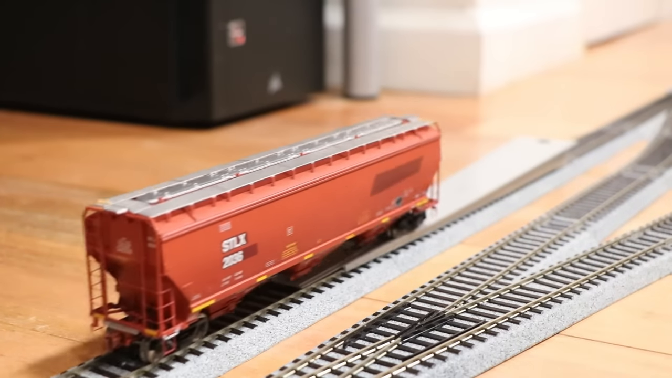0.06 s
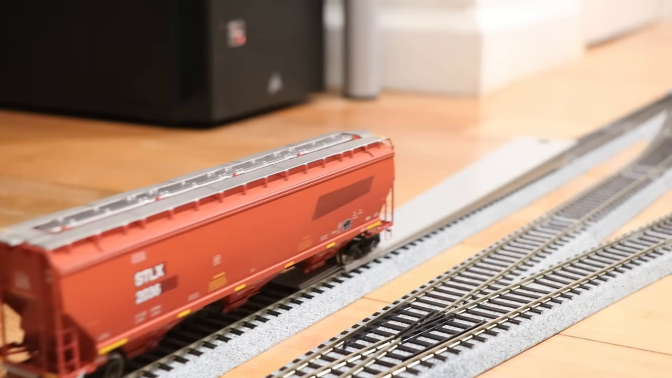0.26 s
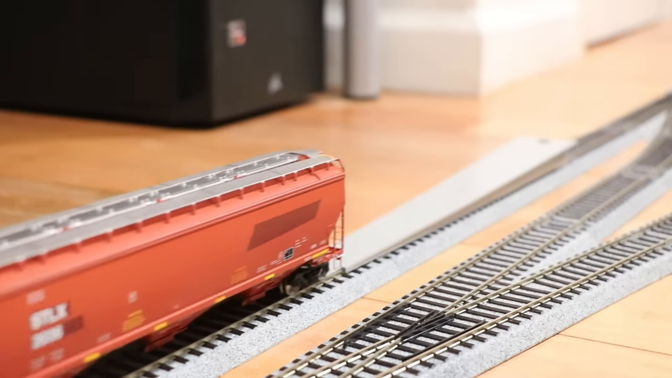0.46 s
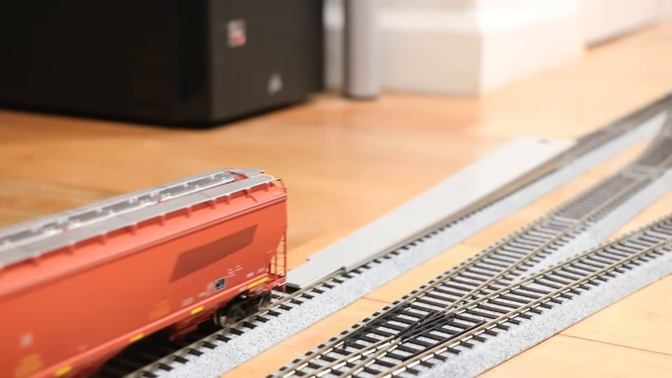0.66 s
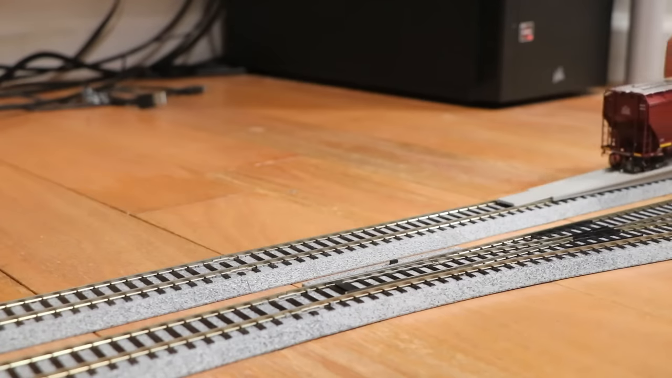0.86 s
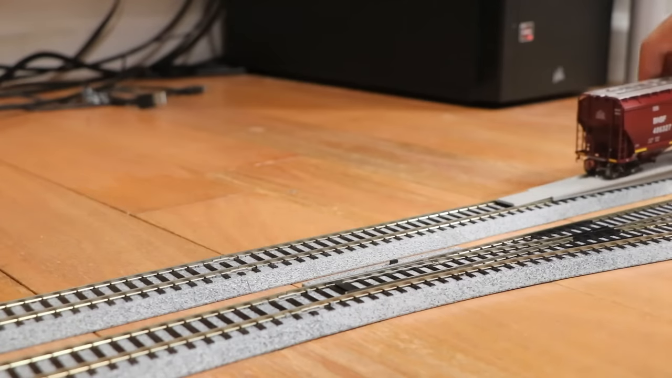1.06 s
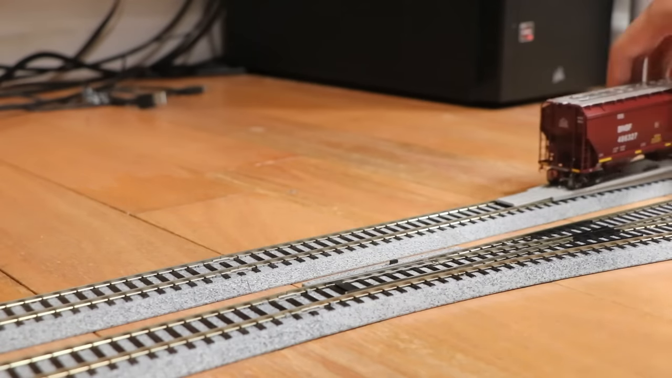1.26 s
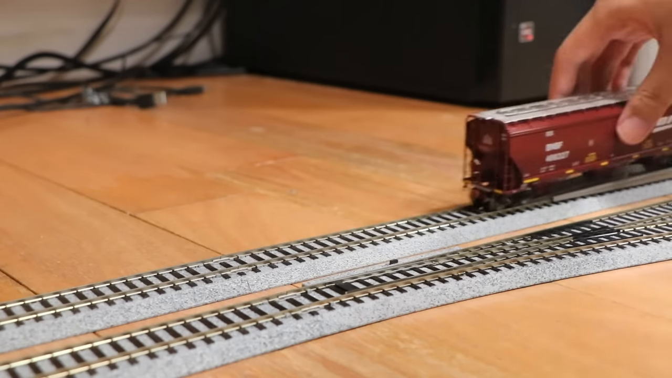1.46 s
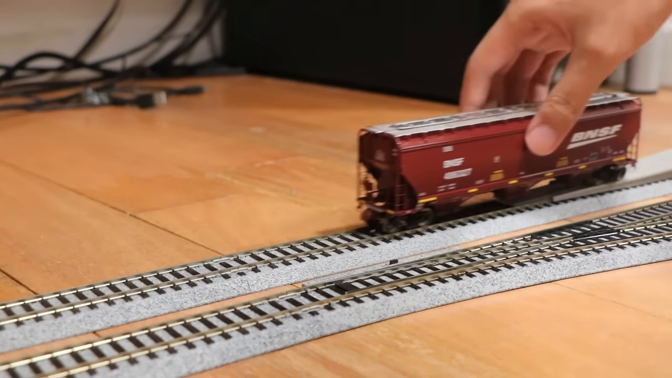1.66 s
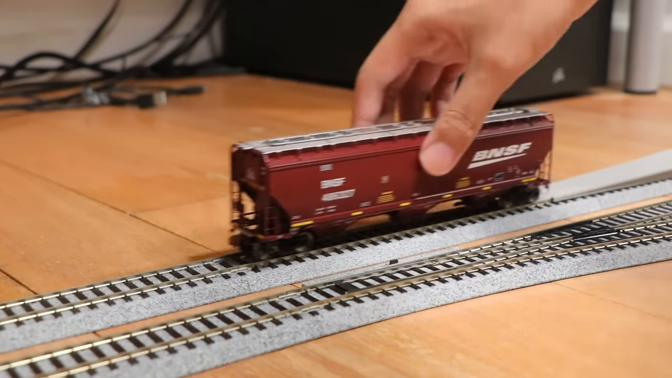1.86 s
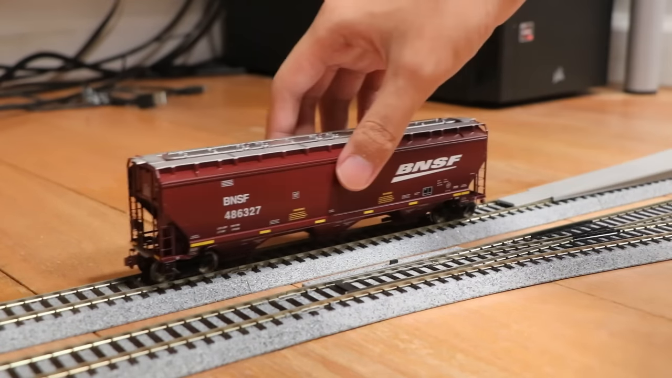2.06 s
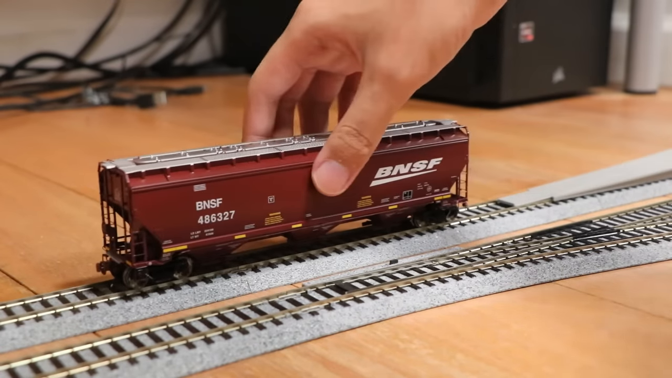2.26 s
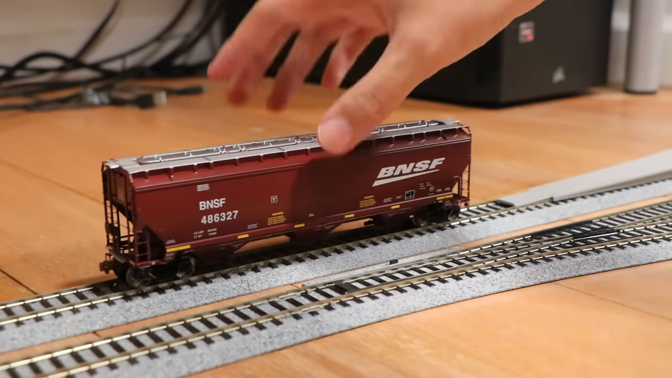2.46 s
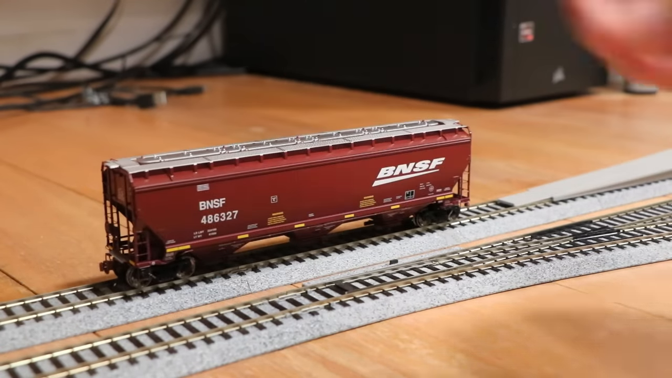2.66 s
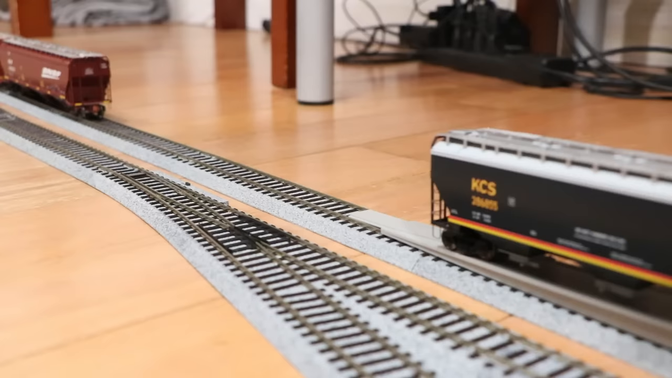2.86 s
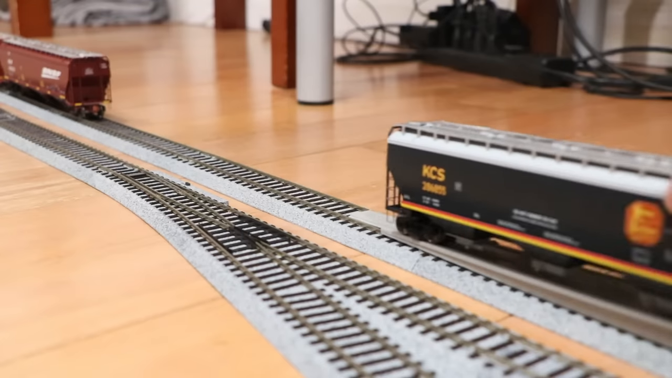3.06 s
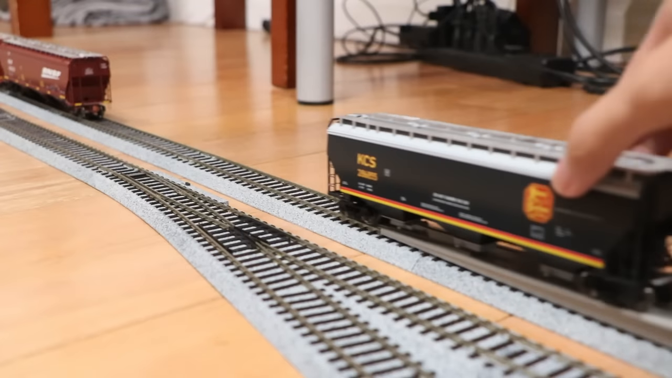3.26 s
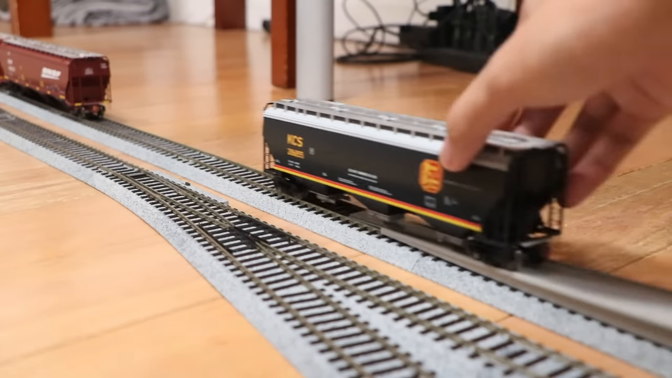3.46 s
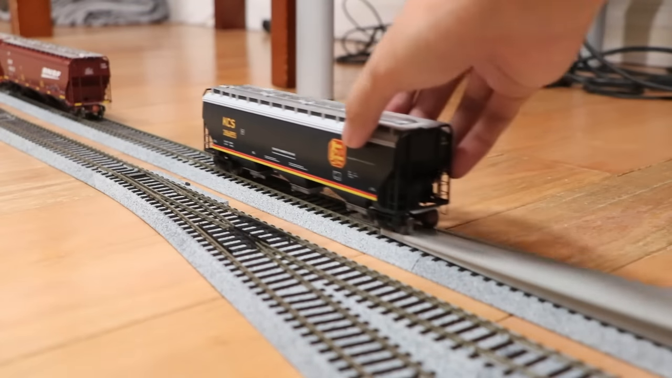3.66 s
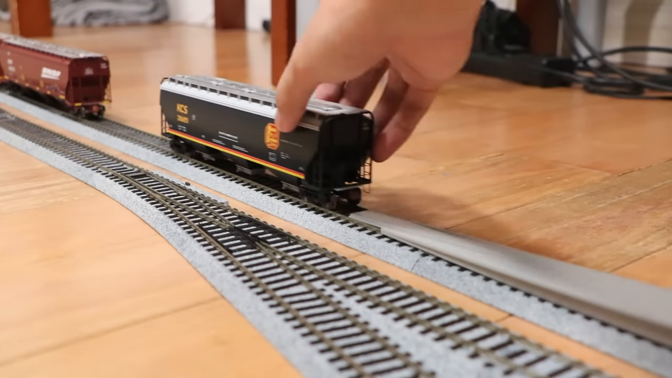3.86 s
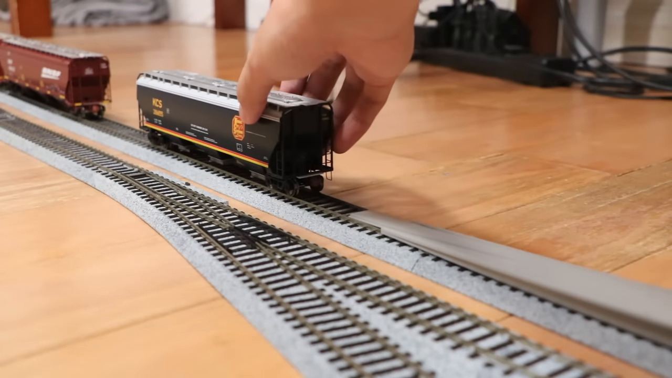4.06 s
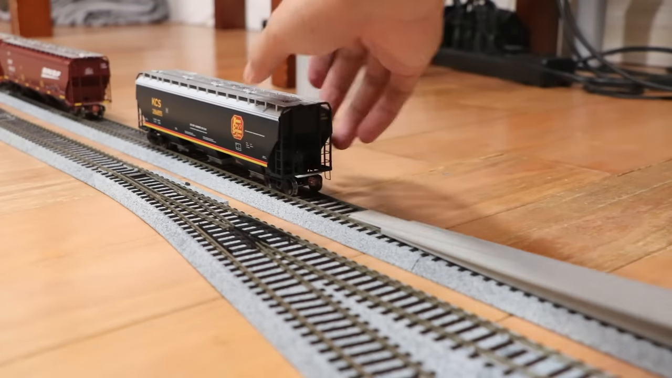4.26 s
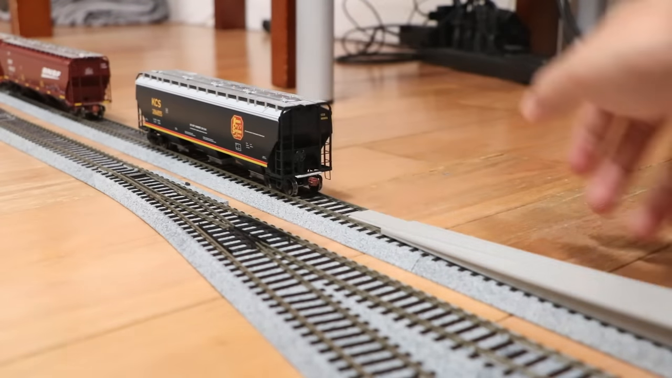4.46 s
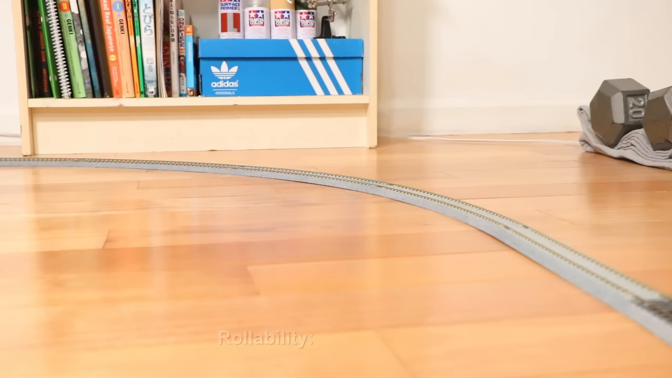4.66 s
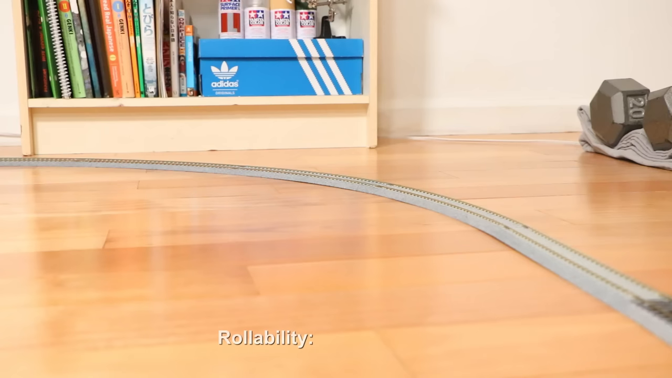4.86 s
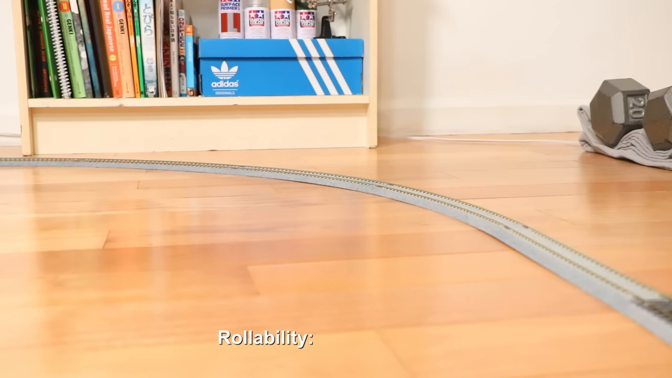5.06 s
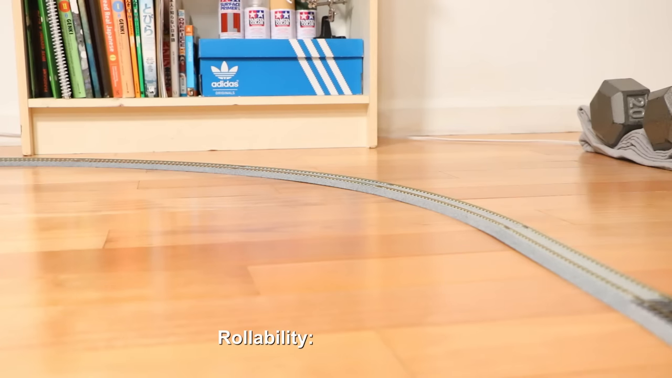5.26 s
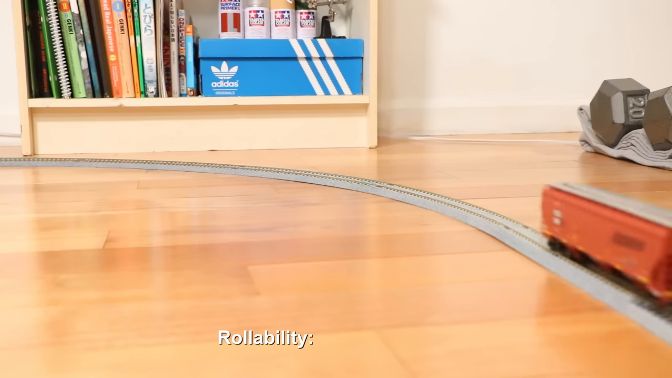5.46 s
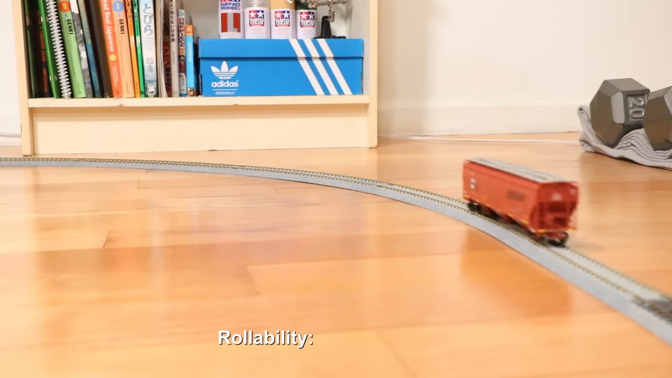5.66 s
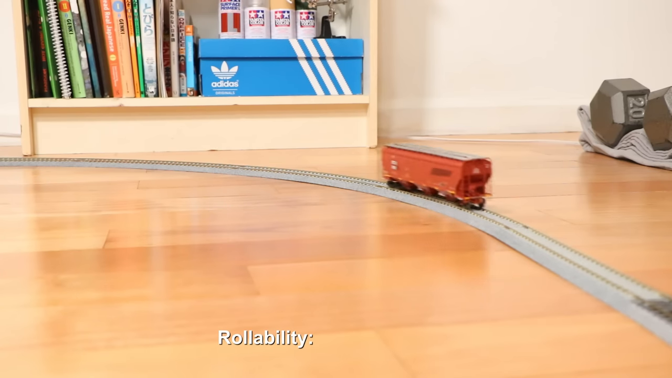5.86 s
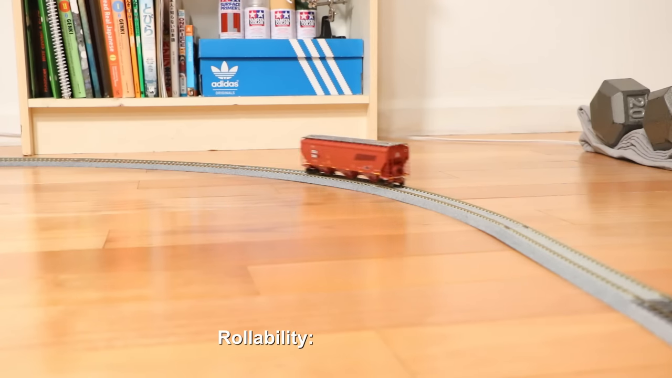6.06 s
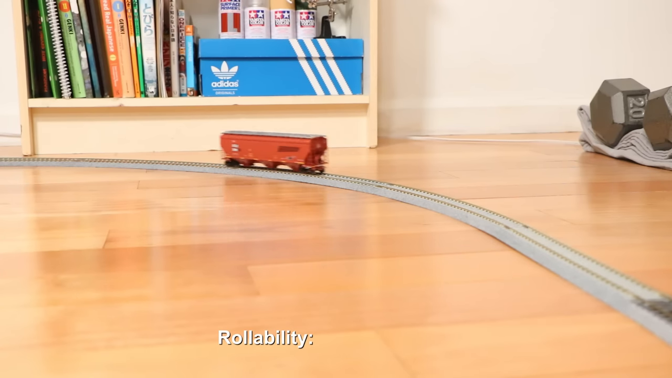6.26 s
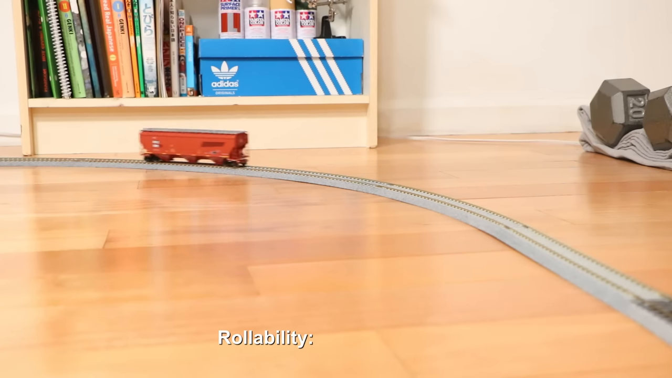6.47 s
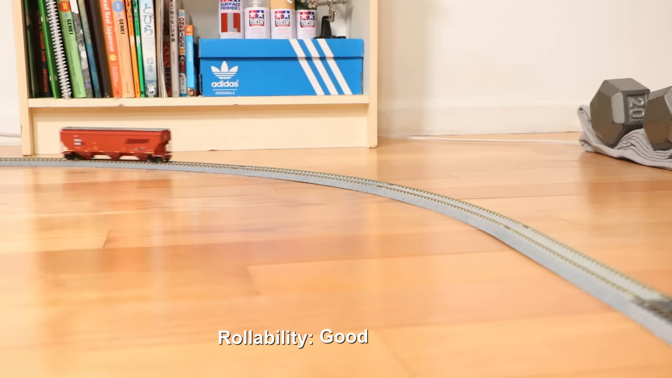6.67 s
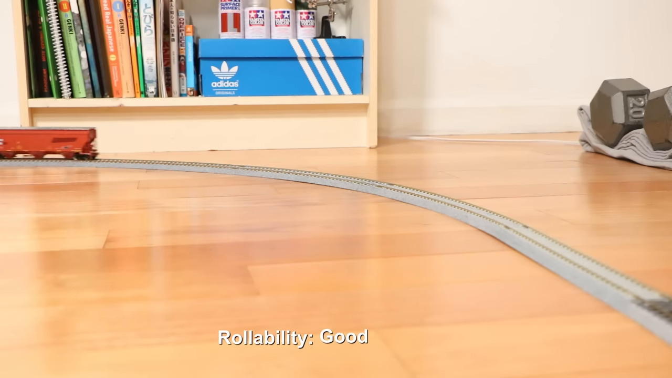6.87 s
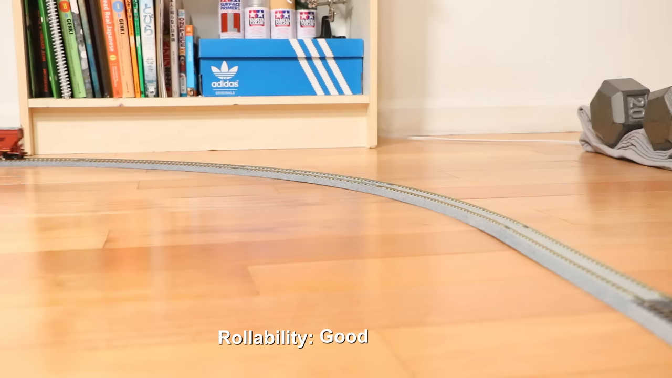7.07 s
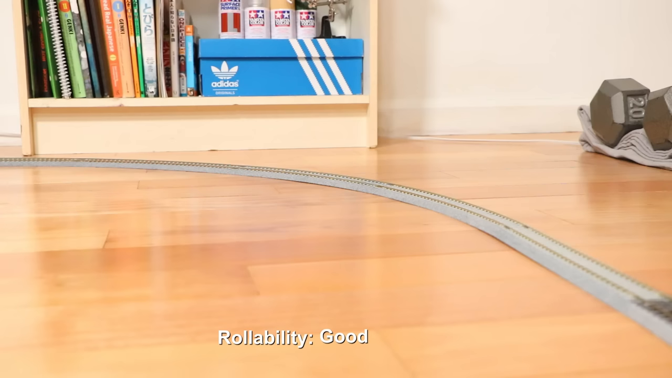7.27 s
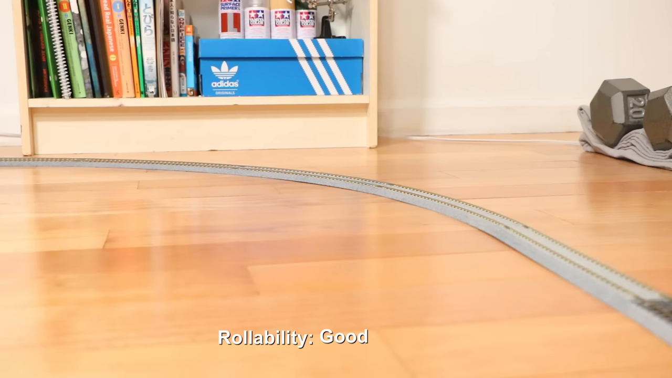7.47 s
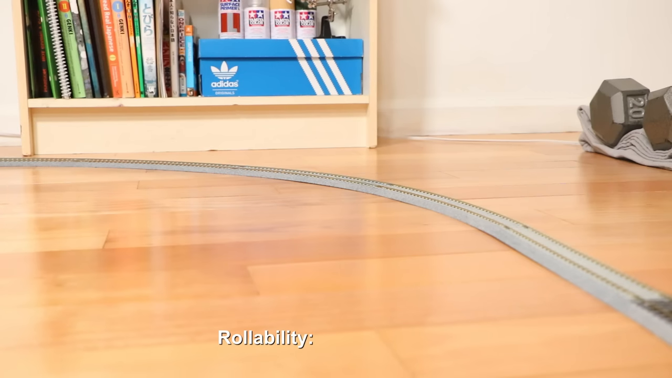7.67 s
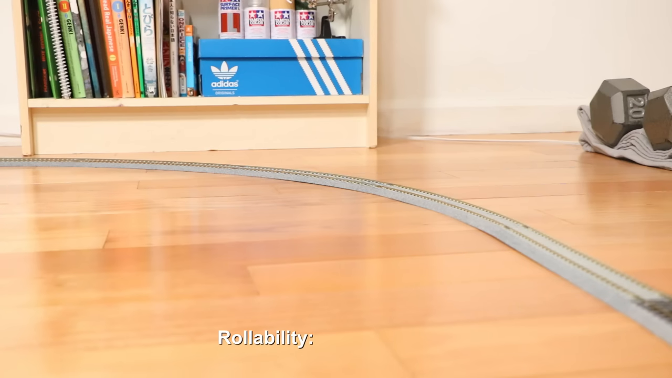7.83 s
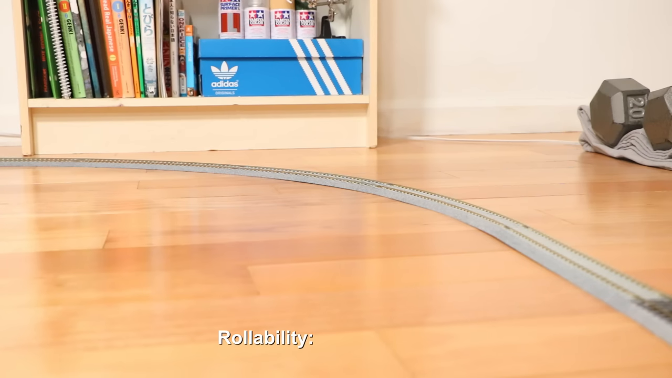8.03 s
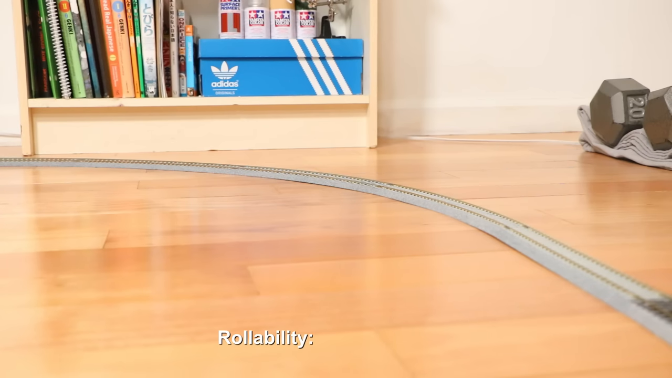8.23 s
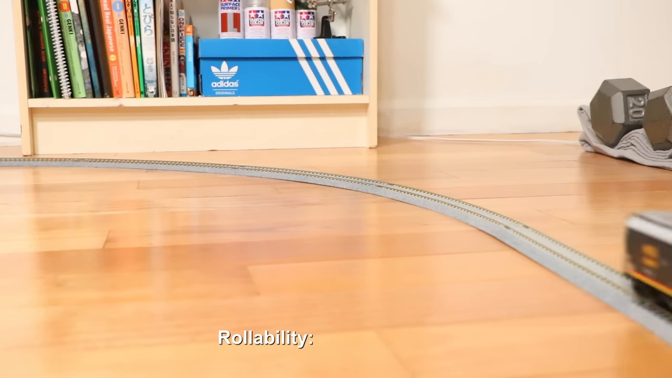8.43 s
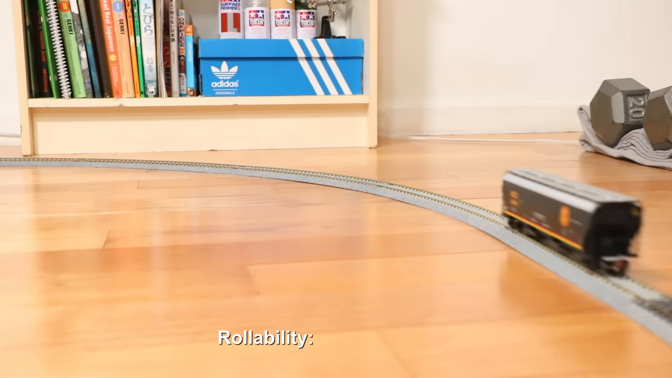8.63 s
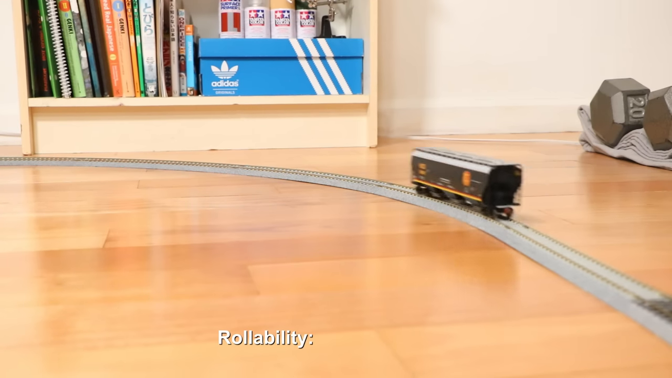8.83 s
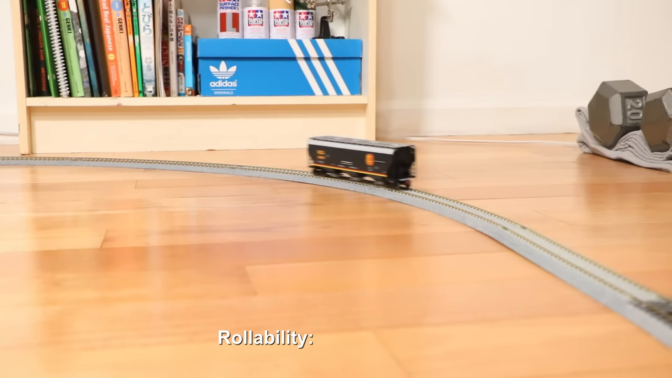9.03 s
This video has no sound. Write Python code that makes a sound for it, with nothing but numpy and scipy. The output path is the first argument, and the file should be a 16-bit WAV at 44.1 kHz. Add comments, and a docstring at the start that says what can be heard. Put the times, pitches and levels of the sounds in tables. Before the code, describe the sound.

Close indoor pickup of toy train cars on plastic track over floorboards. First come soft rolling and light coupler taps, then two short hand-pushed rolls with brittle clicks and a hard clack. Then a car let go makes a continuous bright hissing rattle, jolting over joints, growing as it passes and becoming boomier farther off. A second run starts as it ends, still rolling at the finish. Low hum and floor rumble underneath.

```python
"""A model freight car coasts by with light clicks, two are eased down a ramp by hand, and two are let go
down the ramp and round a curve, rattling from right to left over a quietly humming, hissing room.
Rolling is random wheel impacts and grinding noise, rung by short modes and split into shell, track bed and treads.
Taps are decaying noise bursts with ringing car-body modes and a room tail; squeaks and knocks are band noise.
The wooden floor drums and rumbles as steady coloured noise with passing swells."""
import sys
import numpy as np
from scipy import signal
from scipy.fft import rfft, irfft, next_fast_len
from scipy.io import wavfile
from scipy.ndimage import uniform_filter1d, map_coordinates

SR = 44100
rng = np.random.default_rng(int(sys.argv[2]) if len(sys.argv) > 2 else 0)


def master(y):
    """Save y as 16-bit WAV."""
    cut = np.clip(np.atleast_2d(y).T, -1, 1)
    pcm = np.round(cut * 32767)  # scale
    wavfile.write(sys.argv[1], SR, pcm.astype(np.int16))


N = 401310
TIME = np.arange(N) / SR  # seconds
# course of every car let go, in seconds after release: ramp, curve, far stretch
CURVE_AT_S, CURVE_BLEND_S = 0.97, 0.21
FAR_AT_S, FAR_BLEND_S = 1.97, 0.22


def amp(db):
    """Decibels to gain."""
    return np.exp(np.asarray(db) * (np.log(10) / 20))


def unit(x):
    """x at rms 1."""
    return x / np.sqrt(np.mean(x ** 2) + 1e-20)


def along(points, hz):
    """Read (Hz, value) points on a log frequency axis."""
    f, v = np.transpose(points)
    return np.interp(np.log(hz + 1), np.log(f + 1), v)


def curves(rows):
    """One value per sample for each column after the time."""
    s, *cols = np.transpose(rows)
    return [np.interp(TIME, s, c) for c in cols]


def wobble(rate):
    """A smooth random curve with rate knots a second."""
    knots = rng.standard_normal(int(N * rate / SR) + 4)
    coarse_time = TIME[::32]
    return np.interp(TIME, coarse_time, map_coordinates(knots, [coarse_time * rate]))


def bell(t, centre_s, half_s):
    """A smooth swell that peaks at 1."""
    return np.exp(-np.minimum(((t - centre_s) / half_s).astype(np.float32) ** 2 / 2, 20))


def step(t, at_s, blend_s):
    """A smooth change from 0 to 1."""
    return .5 + .5 * np.tanh((t - at_s) / blend_s)


def surges(rows):
    """Rows (time [s], half length [s], gains [dB]) summed into one dB curve for each gain column."""
    rows = np.array(rows)
    return rows[:, 2:].T @ np.array([bell(TIME, s, half) for s, half in rows[:, :2]])


def filtered(x, response):
    """Filter x by a gain given as a function of frequency."""
    n = x.shape[-1]
    m = next_fast_len(n + 8192, True)  # spare length for the filter's tail
    gain = response(np.fft.rfftfreq(m, 1 / SR)).astype(np.float32)
    return irfft(rfft(x.astype(np.float32), m) * gain, m)[..., :n]


def below(hz, edge_hz):
    """Gain of a steep low-pass."""
    return 1 / np.sqrt(1 + (hz / edge_hz) ** 10)


def above(hz, edge_hz):
    """Gain of the matching high-pass."""
    return np.sqrt(1 - below(hz, edge_hz) ** 2)


def band(hz, centre_hz, octaves):
    """Gain of a bell-shaped band."""
    return np.exp(-(np.log2((hz + 1) / centre_hz) / octaves) ** 2 / 2)


def pair(size, side_db):
    """Stereo white noise: a common part and an opposed part side_db above it."""
    mid, side = rng.standard_normal((2, size))
    side = amp(side_db) * side
    return unit(np.array([mid + side, mid - side]))


def add(out, s, sound):
    """Mix a sound in at time s."""
    start = round(s * SR)
    sound = sound[:, max(-start, 0):]
    part = out[:, max(start, 0):][:, :sound.shape[1]]
    part += sound[:, :part.shape[1]]


def room_tone(air_db, hum_db):
    """Faint coloured hiss, and hum tones that waver in level and phase."""
    # colour of the hiss: (frequency [Hz], gain [dB])
    hiss_colour = [(100, -7), (350, -4.5), (600, -5), (1000, -3.5), (2000, -11), (5000, -14.5),
                   (15500, -24)]
    # hum tones: (frequency [Hz], relative level [dB])
    hum_tones = [(97, -66), (236, -65.5)]
    hiss = filtered(pair(N, side_db=-0.5), lambda hz: amp(along(hiss_colour, hz)))
    hum = np.zeros(N)
    for hz, db in hum_tones:
        swell = amp(db + 3.2 * wobble(3.9))
        hum += swell * np.sqrt(2) * np.sin(2 * np.pi * hz * TIME + 1.16 * wobble(5.6))
    return amp(air_db) * unit(hiss) + amp(hum_db) * hum


def boards():
    """The wooden floor drums and rumbles under the track, more faintly after about 5.5 s, with passing swells."""
    # colour of the drumming: (frequency [Hz], gain [dB])
    drum_colour = [(100, -53), (160, -8), (205, 2), (290, -3.5), (370, -10.5), (500, -12.5), (800, -16),
                   (2000, -76.5)]
    # colour of the rumble: (frequency [Hz], gain [dB])
    rumble_colour = [(20, -24), (40, -18), (65, 4), (100, -3.5), (140, 0), (220, -13.5), (500, -46),
                     (2000, -90)]
    # passing swells: (time [s], half length [s], drumming gain [dB], rumble gain [dB])
    swells = [(0.678, 0.037, 5, 8), (3.347, 0.18, 3, 3), (4.2, 0.14, 3, 3.5), (6.747, 0.11, 2, 8.5),
              (7.303, 0.37, 6, 2.5), (7.755, 0.16, 8.5, 7), (8.05, 0.28, 5, 4), (9, 0.52, 7.5, 1)]
    early_db, late_db = [-51, -55], [-62, -60.5]  # drumming, rumble
    late = step(TIME, at_s=5.46, blend_s=0.35)
    drum_db, rumble_db = np.outer(early_db, 1 - late) + np.outer(late_db, late) + surges(swells)
    drumming = unit(filtered(pair(N, side_db=-15.5), lambda hz: amp(along(drum_colour, hz))))
    rumble = unit(filtered(pair(N, side_db=-15.5), lambda hz: amp(along(rumble_colour, hz))))
    return amp(drum_db) * drumming + amp(rumble_db) * rumble


def wheel_chatter(rate, spread_db, flutter_db, grind_db):
    """Wheels strike specks and pits in the rail at random, rate times a second, over a fine grinding."""
    count = int(rate * N / SR)
    place, strength, sign = rng.random((count, 3)).T
    size = amp(-spread_db * np.log(np.maximum(strength, .02))) * np.sign(sign - .5)
    impacts = unit(np.bincount((place * N).astype(int), size, N))
    grind = amp(grind_db) * rng.standard_normal((2, N))
    return (impacts + grind) * amp(flutter_db * wobble(60))


def ringing(t60):
    """The crowded, short-lived modes of plastic parts, as decaying noise with energy 1 on the left."""
    t = np.arange(SR // 16) / SR
    ring = pair(len(t), side_db=1) * amp(-60 * t / t60)
    return ring / np.linalg.norm(ring[0])


def travelling(chatter, first, last, pan, t60, ring_db, lag_per_db):
    """Each stretch of track answers with other modes; the direct sound reaches the nearer ear first."""
    out, hop = np.zeros((2, N)), SR // 40
    window = np.sin(np.pi * np.arange(2 * hop) / (2 * hop))
    padded = np.pad(chatter, ((0, 0), (hop, 2 * hop)))
    begin = max(int(first * SR) - 2 * hop, -hop)
    end = min(int(last * SR) + 2 * hop, N)
    for start in range(begin, end, hop):
        lag = np.clip(-lag_per_db * pan[max(start, 0)], -16, 16)  # samples between the ears
        arrival = np.sinc(np.arange(40) - 20 - np.array([[lag], [-lag]]) / 2)
        stretch = padded[:, start + hop:start + 3 * hop] * window
        direct = signal.fftconvolve(stretch * window, arrival, axes=1)
        rung = signal.fftconvolve(stretch, amp(ring_db) * ringing(t60), axes=1)
        add(out, start / SR, direct)
        add(out, start / SR, rung)
    return out


def patchy(x, depth_db):
    """Resonances swell and fade as the wheels move along the track."""
    z = signal.stft(x, nperseg=1024)[2]
    field = uniform_filter1d(rng.standard_normal(z.shape[1:]), size=4, axis=0)  # across frequency
    field = uniform_filter1d(field, size=24, axis=1)  # across time
    return signal.istft(z * amp(depth_db * unit(field)), nperseg=1024)[1][:, :N]


def parts(chatter, colour):
    """The chatter sounds in the shell (low), the track bed (middle) and the treads (high), each at rms 1."""
    def response(hz):
        shell = above(hz, 350) * below(hz, 1610)
        bed = above(hz, 2076) * below(hz, 4410)
        tread = above(hz, 5880)
        return (np.array([shell, bed, tread]) * amp(along(colour, hz)))[:, None]

    first, last = np.flatnonzero(chatter[0])[[0, -1]]
    out = np.zeros((3, 2, N), np.float32)
    out[..., first:last] = filtered(chatter[:, first:last], response)
    return np.array([unit(x) for x in out])


def rolling(voices, levels_db, pan_db):
    """Mix shell, track bed and treads, each at its level, at the car's place between left and right."""
    sides = np.array([[.5], [-.5]])
    shell, bed, tread = voices * amp(np.float32(levels_db))[:, None]
    bed = bed * amp(-1.5 * sides)  # the bed sounds from further right than the car
    return (shell + bed + tread) * amp(pan_db * sides)


def heard(first, last):
    """1 while a run is heard, with short fades."""
    return np.interp(TIME, [first - .026, first - .016, last + .014, last + .022], [0, 1, 1, 0])


def slow_run(run, voices, shell_db, bed_db, tread_db, pan_db):
    """One strength drives all three parts: the treads follow it most, the shell least, so harder is brighter."""
    usual_db = -37  # strength at which the balance of the parts is given
    effort = curves(run)[0] - usual_db
    levels = [shell_db + 0.71 * effort, bed_db + effort, tread_db + 1.01 * effort]
    return heard(run[0][0], run[-1][0]) * rolling(voices, usual_db + np.array(levels), pan_db)


def slow_cars():
    """One car coasts, two are pushed: at a crawl impacts are sparser and the shell rings more clearly."""
    # rolling strength of the coasting car: (time [s], level [dB])
    coast = [(0.0, -40), (0.136, -39.5), (0.52, -37), (0.632, -34), (0.762, -36.5), (0.77, -65)]
    # rolling strength of the first pushed car: (time [s], level [dB])
    first_push = [(1.06, -50.5), (1.08, -54), (1.578, -26), (1.722, -32.5), (1.83, -26.5), (1.978, -29.5),
                  (1.992, -24), (2.13, -37), (2.278, -59.5), (2.3, -71)]
    # the second, up to its drop onto the rails, then on along them: two lists of (time [s], level [dB])
    second_push = [
        [(2.97, -59), (3.03, -43), (3.258, -39), (3.34, -34.5), (3.344, -31.5), (3.39, -28)],
        [(3.47, -27.5), (3.73, -27), (3.746, -30.5), (3.908, -27.5), (4.05, -35.5), (4.18, -62)],
    ]
    # colour of rolling while coasting: (frequency [Hz], gain [dB])
    coast_colour = [(180, -45), (300, -14), (360, -19), (562, 0), (937, -8), (1070, -0.5), (1390, -0.5),
                    (2040, -1), (4880, -16), (11300, -27), (15500, -41)]
    # colour of rolling while pushed by hand: (frequency [Hz], gain [dB])
    pushed_colour = [(400, -17), (520, -14.5), (630, -6.5), (900, -9), (1100, -5), (1550, -2), (1900, -1.5),
                     (2400, 0.5), (3700, -8), (4700, -12), (6000, -20.5), (9800, -27.5), (15500, -39)]
    chatter = wheel_chatter(rate=2600, spread_db=2.0, flutter_db=0.26, grind_db=0)
    second = np.vstack(second_push)
    rung = travelling(chatter, coast[0][0], second[-1][0], np.full(N, -.5),
                      t60=0.087, ring_db=-2.0, lag_per_db=3.0)
    rung = patchy(rung, depth_db=1.73)
    coasting, pushed = parts(rung, coast_colour), parts(rung, pushed_colour)
    return (slow_run(coast, coasting, shell_db=-4.0, bed_db=-2.5, tread_db=-15.0, pan_db=0.5)
            + slow_run(first_push, pushed, shell_db=-5.5, bed_db=-5.5, tread_db=-17.0, pan_db=-1.8)
            + slow_run(second, pushed, shell_db=-6.5, bed_db=-3.5, tread_db=-17.5, pan_db=-1.4))


def clicks(t60, crack_t60, crack_db, modes_db, level_db):
    """Wheels drop and couplers tap: a brief crack, a dying rattle and car-body modes at new strengths."""
    # taps: (time [s], relative level [dB], boost of the bright ring [dB])
    tap_list = [(.556, -23, -12), (0.599, -24, -8), (.623, -11.5, -2), (.639, -23, -3), (.742, -25.5, 2),
                (0.9108, -15, 12), (0.9173, -10, 12), (.964, -13, -1), (.9685, -15.5, 6), (1.361, -17, 7),
                (1.51, -14, -3), (1.5384, -10, 5), (1.987, -19, -7), (3.019, -28, -5), (3.285, -20, -7),
                (3.345, -6.5, 1), (3.357, -9, -2), (3.4193, -10, 0), (3.425, -1.5, 0), (3.841, -5.5, 8),
                (3.8458, -16, 1), (3.902, -8, -3), (5.1035, -21, -2), (5.3403, -23, 2), (5.409, -8, -3)]
    # colour of a tap: (frequency [Hz], gain [dB])
    tap_colour = [(200, -45), (400, -25), (900, -12.5), (1500, -4), (2000, -6), (2700, -1), (3900, -10.5),
                  (5500, -18.5), (8000, -22.5), (15500, -41)]
    # modes of the plastic car body: (frequency [Hz], mean relative level [dB], t60 [s])
    car_modes = [(1453, -15, .15), (1760, -5, 0.065), (1880, -12, .12), (2230, -7, .055), (2820, -16, .06),
                 (3120, -11, .07), (3930, -13, .04), (3820, -9, .07), (4400, -10, .05), (5470, -15, .04)]
    out, t = np.zeros((2, N)), np.arange(SR // 8) / SR
    for s, db, bright_db in tap_list:
        def response(hz):
            return amp(along(tap_colour, hz) + bright_db * band(hz, centre_hz=4530, octaves=0.43))

        decay = amp(-60 * t / t60) + amp(crack_db - 60 * t / crack_t60)
        tap = filtered(pair(len(t), side_db=-3.5) * decay, response)
        ring = np.zeros((2, len(t)))
        for hz, mode_db, life in car_modes:
            strength = amp(mode_db + rng.normal(0, 3.6, (2, 1)) - 60 * t / life)
            ring += strength * np.sin(2 * np.pi * (hz * t + rng.random((2, 1))))
        sound = tap / np.abs(tap).max() + amp(modes_db) * ring / np.abs(ring).max()
        add(out, s, amp(db + level_db) * sound)
    return out


def room(x):
    """The room's answer: a noise tail, 5 ms late, each frequency dying at its own speed."""
    # decay of the room: (frequency [Hz], t60 [s])
    room_decay = [(200, 0.21), (2000, 0.29), (6000, 0.18), (14000, 0.18)]
    hz, t, z = signal.stft(rng.standard_normal((2, SR // 2)), SR, nperseg=256)
    tail = signal.istft(z * amp(-60 * t / along(room_decay, hz)[:, None]), SR, nperseg=256)[1]
    tail = np.pad(tail / np.linalg.norm(tail[0]), ((0, 0), (SR // 200, 0)))
    return signal.fftconvolve(x, tail, axes=1)[:, :N]


def rubs():
    """Fingers scuff the car and a flange squeaks on the ramp: short swells of band noise."""
    # sliding contacts: (time of the peak [s], half length [s], level [dB], centre [Hz], width [octaves])
    rub_list = [(2.903, 0.017, -47, 1500, 1), (3.399, 0.0097, -23, 3050, 0.04)]
    out, t = np.zeros((2, N)), np.arange(SR) / SR - .5
    for s, half, db, centre_hz, octaves in rub_list:
        tone = unit(filtered(pair(SR, side_db=-1), lambda hz: band(hz, centre_hz, octaves)))
        add(out, s - .5, amp(db) * tone * np.exp(-(t / half) ** 2 / 2))
    return out


def knocks(t60):
    """Dull bumps of hand and ramp on the boards; the lower ones last longer."""
    # knocks: (time [s], level before decay [dB], centre [Hz], width [octaves])
    knock_list = [(3.426, -36, 500, 0.95), (3.452, -38, 133, 0.21), (3.851, -37, 87.4, 0.18),
                  (3.916, -36, 300, 1.2), (4.221, -48, 700, 0.47), (4.805, -33, 374.3, 1.5),
                  (5.183, -27.5, 520, 1.2), (5.258, -43, 400, 1.1), (5.41, -33, 550, 1.4)]
    out, t = np.zeros((2, N)), np.arange(SR // 3) / SR
    onset = 1 - np.exp(-t / 0.00028)
    for s, db, centre_hz, octaves in knock_list:
        thud = unit(filtered(pair(len(t), side_db=-17), lambda hz: band(hz, centre_hz, octaves)))
        life = t60 * np.sqrt(500 / centre_hz)  # t60 is given for 500 Hz
        add(out, s, thud * amp(db - 60 * t / life) * onset)
    return out


def course(age):
    """Levels of shell, track bed and treads in dB, for a car let go age seconds ago."""
    # base level at full speed: one value each for shell, track bed and treads [dB]
    full_speed_db = [-36, -25, -31.5]
    # rise per tenfold speed: shell, track bed, treads [dB]
    speed_db = [3.5, 16.5, 21.5]
    # gain when the car passes closest: shell, track bed, treads [dB]
    nearest_db = [4.5, 1, 5]
    # gain on the far stretch, where the shell booms: shell, track bed, treads [dB]
    far_db = [3, 0.3, 1]
    # drift as the car slows on the curve: shell, track bed, treads [dB per s]
    slowing_db = [2, -0.26, -1.77]
    gather_s = 0.21  # the car gathers speed
    speed = 1 - np.exp(-(np.maximum(age, .001) / gather_s) ** 2)
    return (np.array(full_speed_db)[:, None] + np.outer(speed_db, np.log10(speed))
            + np.outer(nearest_db, bell(age, centre_s=1.358, half_s=0.15))
            + np.outer(far_db, step(age, FAR_AT_S, FAR_BLEND_S))
            + np.outer(slowing_db, np.maximum(age - CURVE_AT_S, 0)))


def waver(depth_db, rate):
    """A slight random waver in the level of the rattle."""
    return depth_db * wobble(rate)


def fast_cars():
    """At speed impacts merge into a hissing rattle that changes colour from ramp to curve to far stretch."""
    # cars let go: (release [s], heard from [s], heard until [s], shell [dB], track bed [dB], treads [dB])
    free_runs = [(4.632, 4.64, 7.63, 0, -1, -1), (7.567, 7.665, 9.1, -1.5, -3, -1)]
    # trucks jolt over ramp and rail joints:
    # (time [s], half length [s], gain of shell [dB], of track bed [dB], of treads [dB])
    jolts = [(4.816, 0.061, 7.5, 6.5, 0), (4.974, 0.025, -1, 3.5, -1), (5.1, 0.032, -0.5, 2.5, 1),
             (5.256, 0.012, 2.5, 1, 2), (5.368, 0.019, 0, -0.5, 4.5), (5.742, 0.064, 1, 2, 2.5),
             (6.1, 0.037, -4, 1, -1), (6.667, 0.077, 2.5, 1, .5), (7.027, 0.038, -0.5, 2, 1.5),
             (7.56, 0.054, 5, -2, 1.5), (7.695, 0.035, 6, 6, -4), (7.869, 0.1, 7.5, 4.5, -1),
             (8.012, 0.02, -2.5, 3.5, 1.5), (8.147, 0.016, 1, 5, 1.5), (8.365, 0.069, 1, 1, 2.5),
             (8.797, 0.023, -1, 4, 2), (8.986, 0.045, 3, 1, 2)]
    # colour of rolling down the ramp: (frequency [Hz], gain [dB])
    ramp_colour = [(180, -56), (300, -31), (384, -29), (543, -19), (685, -20), (877, -12.5), (1000, -14),
                   (1780, -4.5), (2740, -0.5), (3510, -5), (4280, -5), (6460, -9), (8560, -15),
                   (13800, -22), (15500, -27)]
    # colour of rolling round the curve: (frequency [Hz], gain [dB])
    curve_colour = [(400, -27), (650, -21.5), (900, -15.5), (1400, -3), (2000, 0.5), (3000, 2), (4700, -1),
                    (5400, -5.5), (6300, -10.5), (9500, -18), (15500, -30)]
    # colour of rolling on the far stretch of the curve: (frequency [Hz], gain [dB])
    far_colour = [(180, -74), (300, -30), (360, -32), (517, -19.5), (808, -17), (907, -8), (985, -9),
                  (1540, -0.5), (2440, -4), (3180, -6), (4650, -4), (6050, -12.5), (13600, -30.5),
                  (15500, -31)]
    chatter = wheel_chatter(rate=4500, spread_db=2.5, flutter_db=0.36, grind_db=0.5)
    age, gain, car_db = np.zeros(N), np.zeros(N), np.zeros((3, N))
    for release, first, last, *parts_db in free_runs:
        gate = heard(first, last)
        louder = gate > gain
        age = np.where(louder, TIME - release, age)
        car_db = np.where(louder, np.array(parts_db)[:, None], car_db)
        gain = np.maximum(gain, gate)
    ramp_pan_db, far_pan_db = -4.5, 2  # each car crosses from right to left
    pan = ramp_pan_db + (far_pan_db - ramp_pan_db) * step(age, at_s=1.14, blend_s=0.52)
    rung = travelling(chatter, free_runs[0][1], free_runs[-1][2], pan,
                      t60=0.12, ring_db=0.0, lag_per_db=1.75)
    rung = patchy(rung, depth_db=-0.05)
    curve, far = step(age, CURVE_AT_S, CURVE_BLEND_S), step(age, FAR_AT_S, FAR_BLEND_S)
    voices = (1 - curve) * parts(rung, ramp_colour)
    voices = voices + curve * (1 - far) * parts(rung, curve_colour)
    voices = voices + curve * far * parts(rung, far_colour)
    levels_db = course(age) + car_db + surges(jolts) + waver(depth_db=0.23, rate=30)
    return gain * rolling(voices, levels_db, pan)


def narrowed(x, wide_hz):
    """Long waves reach both ears alike; only the shorter ones spread out."""
    mid = x.mean(0)
    side = filtered((x[0] - x[1]) / 2, lambda hz: hz / np.hypot(hz, wide_hz))
    return np.array([mid + side, mid - side])


def scene():
    """Rolling cars, taps with their room tail, knocks, floor boards and room tone."""
    taps = clicks(t60=0.068, crack_t60=0.015, crack_db=-1.5, modes_db=-9, level_db=-4.5)
    taps = taps * amp([[-1.5], [1.5]])  # towards the right
    cars = narrowed(slow_cars() + fast_cars() + rubs(), wide_hz=850)
    background = boards() + room_tone(air_db=-53.0, hum_db=-1.0)
    return cars + taps + amp(-4.0) * room(taps) + knocks(t60=0.11) + background


def record(dry):
    """Nothing passes above a sharp band limit."""
    return filtered(dry, lambda hz: hz < 15800)


dry = scene()
out = record(dry)
master(out)
```